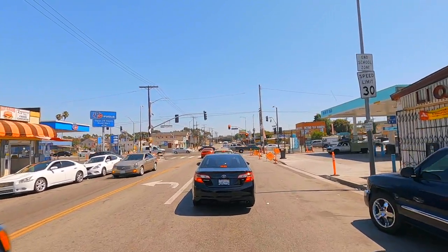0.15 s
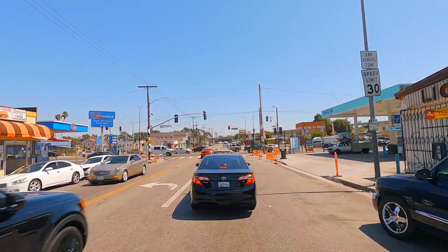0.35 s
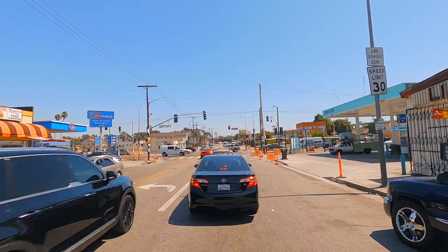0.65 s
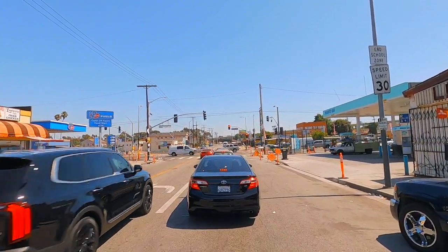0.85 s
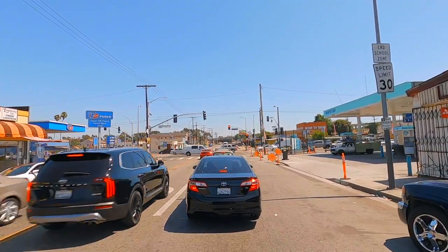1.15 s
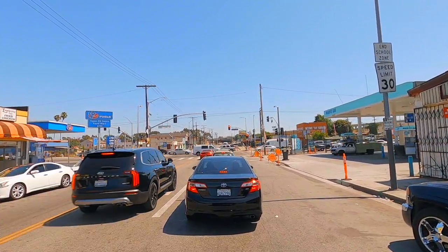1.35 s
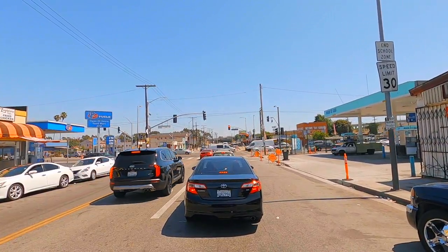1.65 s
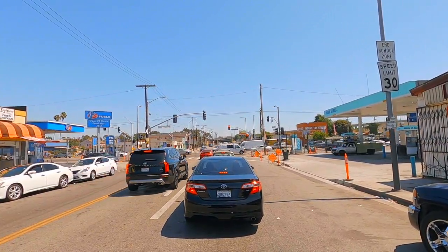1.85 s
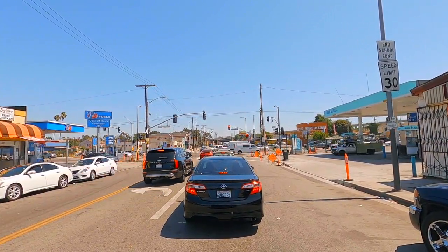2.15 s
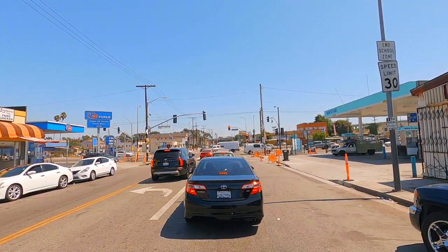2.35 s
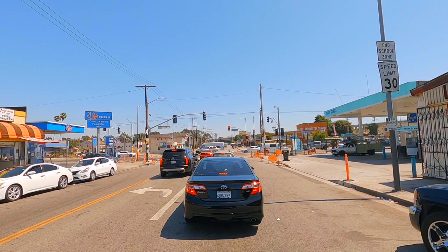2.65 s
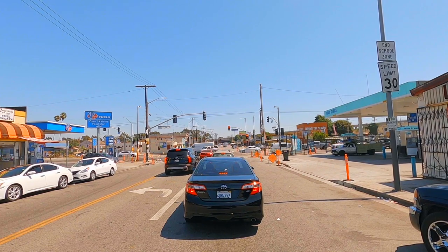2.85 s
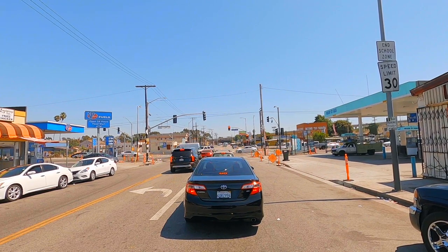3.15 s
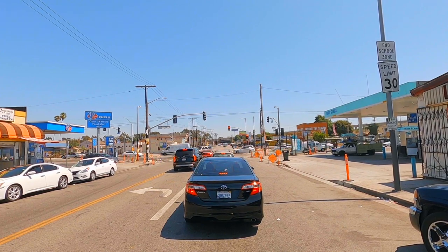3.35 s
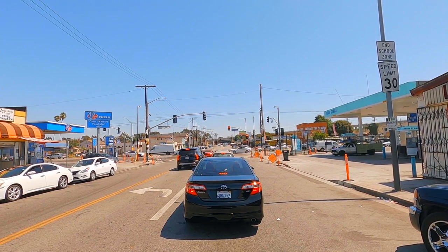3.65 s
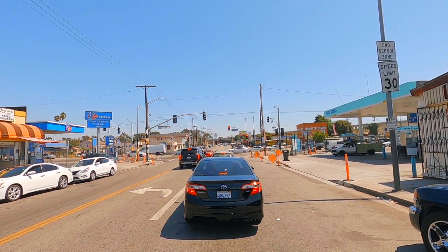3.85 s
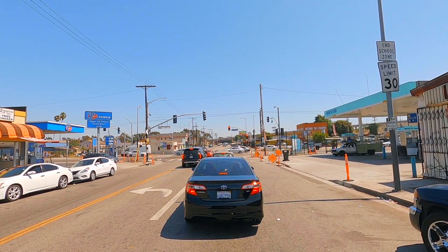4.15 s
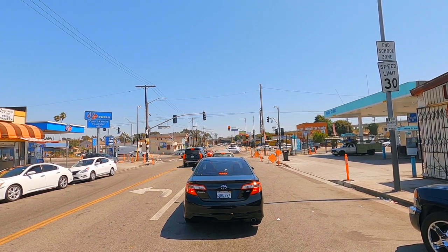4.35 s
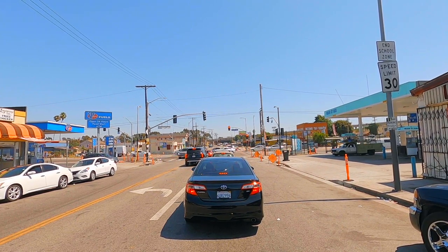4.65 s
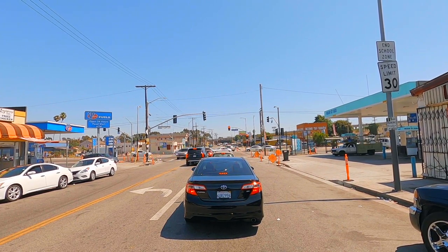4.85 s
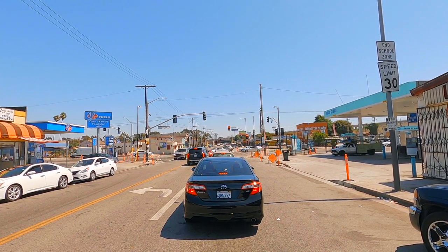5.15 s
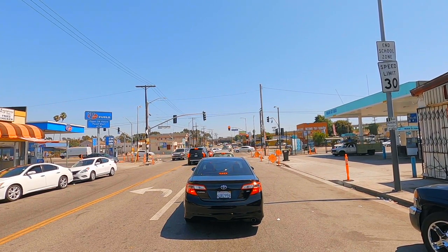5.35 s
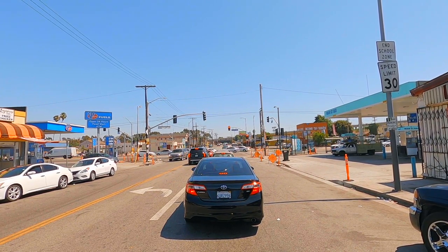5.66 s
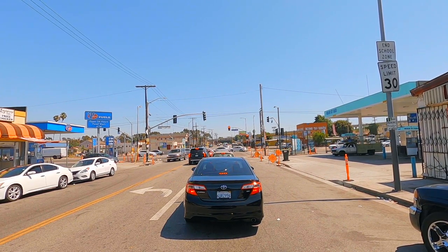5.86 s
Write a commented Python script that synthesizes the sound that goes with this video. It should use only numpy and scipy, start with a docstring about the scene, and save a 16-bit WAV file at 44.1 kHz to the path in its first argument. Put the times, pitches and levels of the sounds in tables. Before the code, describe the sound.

A vehicle sweeps past over soft tyre roar and engine rumble, then a nearby car horn beeps sharply twice, echoing briefly off the street.

```python
"""City traffic: engines hum and tyres roar and hiss throughout, made from coloured noise and a wavering tone.
First an SUV whirrs past among close tyre swishes; a brief faint moan and a slow swell of roar follow.
Then a two-note horn, built from partials, toots twice close by, and cars and shop fronts echo each toot.
Between the toots the engines ease to idle. A limiter ducks loud peaks and lets the street up again slowly."""
import sys
import numpy as np
from scipy import signal
from scipy.fft import rfft, irfft, next_fast_len
from scipy.io import wavfile
from scipy.ndimage import uniform_filter1d, minimum_filter1d, map_coordinates

SR = 44100
rng = np.random.default_rng(int(sys.argv[2]) if len(sys.argv) > 2 else 0)


def put_to_file(sound):
    """Save the sound as 16-bit audio at rate SR, in the file named by the first command-line argument."""
    columns = np.atleast_2d(sound).T  # one column per channel
    safe = np.clip(columns, -1, 1)
    whole_steps = np.round(safe * 32767)
    wavfile.write(sys.argv[1], SR, whole_steps.astype(np.int16))


N = 264908

# Taps on the horn: start_s, level_db, length (times a normal tap)
HORN_TAPS = [(3.477, -1.6, 1.04), (4.383, -1.5, 1.1)]
# Partials of the lower horn, for a normal tap: pitch_hz, level_db, build_up_s, ring_down_s (to -60 dB)
LOW_HORN_PARTIALS = [(410, -12.5, .032, .06), (812, -3, .0135, .09), (1224, -3.6, .0215, .04),
                     (1650, -23.5, .02, .028), (2024, -24.5, .021, .08), (2850, -53, .022, .05)]
# Partials of the higher horn, for a normal tap: pitch_hz, level_db, build_up_s, ring_down_s (to -60 dB)
HIGH_HORN_PARTIALS = [(522, -9, .03, .072), (1013, -9.2, .0212, .088), (1533, -29.5, .0326, .14),
                      (2045, -35, .025, .1), (2505, -41, .018, .055), (2585, -46, .036, .06)]
# Echoes off road, cars and shop fronts, before the panels colour them: delay_s, level_db
WALL_ECHOES = [(.00624, -15.5), (.02525, -16), (.02732, -13.5), (.04042, -18.5), (.05803, -24.5),
               (.06083, -24.5), (.08649, -27), (.11712, -39)]
# How small panels colour the echoes, with little bass: pitch_hz, gain_db
PANEL_COLOUR = [(350, -8), (550, -3.5), (850, 5), (1500, 1), (2600, -3.5)]
# How long scattered sound lasts in the street: pitch_hz, decay_s (to -60 dB)
STREET_DECAY = [(300, 0.3), (1000, 0.49), (3000, 0.21), (10000, 0.08)]
# Colour of tyre roar on asphalt: pitch_hz, relative_level_db (per Hz)
ROAR_COLOUR = [(90, -34.5), (180, -8), (225, 0), (330, -2.5), (460, -2), (620, -3.5), (950, -4.5),
               (1200, -11), (1500, -17.5), (1850, -23.5), (2400, -32.5), (3100, -41.5), (4000, -50),
               (8000, -87)]
# Colour of air squeezed from the treads: pitch_hz, relative_level_db (per Hz)
HISS_COLOUR = [(1500, -19.5), (3000, -3.5), (4800, -1), (6500, -5), (9000, -9.5), (12000, -13.5),
               (15000, -14.5)]
# Wheels passing close: peak_s, half_length_s, level_db, pitch (times the usual swish)
CLOSE_WHEELS = [(0.117, 0.33, -75, 0.96), (1.122, 0.14, -72.5, 1.01), (1.3, .056, -78.5, 1.15),
                (1.52, 0.14, -69, 0.76), (1.9, .35, -80, 0.84)]
# Colour of the usual tread swish: pitch_hz, relative_level_db (per Hz)
SWISH_COLOUR = [(2000, -17), (2900, -1.5), (3600, -7), (4200, -6), (4750, 3.5), (5200, -6), (5600, -0.5),
                (6600, -13.5), (8000, -13), (11000, -27), (15000, -45)]
# Vehicles going by, roar before the body lift: loudest_s, time_to_half_power_s, level_db
VEHICLE_PASSES = [(.15, 0.19, -39.7), (1.55, 1, -38)]
# Colour of the SUV's whirr: pitch_hz, relative_level_db (per Hz)
WHIRR_COLOUR = [(1200, -29), (1600, -3), (1800, 3.5), (2100, -5.5), (2600, -13.5), (3300, -34), (5000, -60)]
# Colour of engine rumble: pitch_hz, relative_level_db (per Hz)
RUMBLE_COLOUR = [(15, -28.5), (25, -12), (50, -9), (75, -5.5), (105, -1.5), (170, -2.5), (280, -9.5),
                 (420, -36.5), (800, -95)]

FAR_TRAFFIC_DB = -43  # steady roar of the rest of the street, before the body lift
HISS_DB, HISS_FOLLOWS = -81, 0.59  # hiss with far traffic alone, and the dB it gains for each dB of roar
PULL_DB, IDLE_DB = -48, -49  # engine base level when pulling gently, then idling
EASE_AT_S, EASE_S = 3.9, .3  # when and how slowly the engines drop to idle
TOP_HZ = 15400  # nothing is kept from here up


def amp(db):
    """Turn decibels into gain."""
    return 10 ** (np.asarray(db) / 20)


def unit(x):
    """Scale x to an average strength (rms) of 1."""
    return x / np.sqrt(np.mean(x ** 2) + 1e-20)


def along(points, hz):
    """Read values between (pitch, value) points, with pitch on a log axis."""
    f, v = np.transpose(points)
    return np.interp(np.log(hz + 1), np.log(f + 1), v)


def wobble(rate):
    """A smooth random curve through `rate` random points a second."""
    knots = rng.standard_normal(int(N * rate / SR) + 4)
    return map_coordinates(knots, [np.arange(N) * rate / SR])


def filtered(x, response):
    """Multiply each frequency in x by its gain."""
    m = next_fast_len(N + SR // 2)
    gain = response(np.fft.rfftfreq(m, 1 / SR))
    return irfft(rfft(x, m) * gain, m)[:N]


def rush(spectrum, patchy_db):
    """Coloured noise of rms 1, with random louder and softer patches in time and pitch."""
    z = signal.stft(rng.standard_normal(N), nperseg=1024)[2]
    field = uniform_filter1d(rng.standard_normal(z.shape), size=5, axis=0)  # smooth across pitch
    field = uniform_filter1d(field, size=10, axis=1)  # smooth across time
    patchy = z * amp(patchy_db * unit(field))
    noise = signal.istft(patchy, nperseg=1024)[1][:N]
    return unit(filtered(noise, lambda hz: amp(along(spectrum, hz))))


def toots():
    """Each tap sounds both horns, about a major third apart, and the street answers."""
    out = np.zeros(N)
    for start, db, length in HORN_TAPS:
        t = np.arange(N) / SR - start
        both = horn(LOW_HORN_PARTIALS, t, length) + horn(HIGH_HORN_PARTIALS, t, length)
        out += amp(db) * street(both)
    return out


def horn(partials, t, length, waver=0.005, sharpen=0.0056, rough=0.22, lag_hz=800):
    """The diaphragm builds up while the contact is closed, then each partial rings down in the trumpet."""
    tone = np.zeros(N)
    for hz, db, build, t60 in partials:
        driven = np.clip(t / (build * length), 0, 1)
        rise = np.sin(np.pi / 2 * driven) ** (1 + hz / lag_hz)  # overtones need a wide swing and come later
        fall = amp(-60 * np.maximum(t - build * length, 0) / t60)
        bend = sharpen * (driven - fall) * (t > 0)  # flat at the start, sharp as the swing dies
        drift = np.cumsum(bend + waver * wobble(150) * driven) / SR
        chatter = 1 + rough * wobble(400)  # the contact breaker closes unevenly
        wave = np.sin(2 * np.pi * hz * (t + drift))
        tone += amp(db) * rise * fall * chatter * wave
    return tone


def street(x, scatter_db=-25):
    """Surfaces return distinct delayed echoes and a faint scattered tail that dies at its own rate per pitch."""
    hz, t, z = signal.stft(rng.standard_normal(SR // 2), SR, nperseg=256)
    decay = amp(-60 * t / along(STREET_DECAY, hz)[:, None])
    tail = signal.istft(z * decay, SR, nperseg=256)[1]
    scatter = signal.fftconvolve(x, tail / np.linalg.norm(tail))[:N]
    echoes = np.zeros(N)
    for delay, db in WALL_ECHOES:
        echoes += amp(db) * np.pad(x, (round(delay * SR), 0))[:N]
    coloured = filtered(echoes, lambda f: amp(along(PANEL_COLOUR, f)))
    return x + coloured + amp(scatter_db) * scatter


def tyres(roar_db, body_db=0.44):
    """The roar and a thin, steadier hiss carry from the whole street; wheels that pass close add a swish."""
    t = np.arange(N) / SR
    roar = amp(roar_db + body_db + 0.32 * wobble(8.9)) * rush(ROAR_COLOUR, patchy_db=1.0)
    hiss_db = HISS_DB + HISS_FOLLOWS * (roar_db - FAR_TRAFFIC_DB)
    hiss = amp(hiss_db + 0.27 * wobble(14.0)) * rush(HISS_COLOUR, patchy_db=1.5)
    swish = np.zeros(N)
    for peak, width, db, pitch in CLOSE_WHEELS:
        tread = [(hz * pitch, level) for hz, level in SWISH_COLOUR]
        swell = np.exp(-((t - peak) / width) ** 2)
        swish += amp(db) * swell * rush(tread, patchy_db=3.0)
    return roar + hiss + swish


def passing_db():
    """Each vehicle's roar falls with the square of its distance, over the steady far traffic."""
    t = np.arange(N) / SR
    near = np.zeros(N)
    for peak, width, db in VEHICLE_PASSES:
        near += amp(db) ** 2 / (1 + ((t - peak) / width) ** 2)
    return 10 * np.log10(amp(FAR_TRAFFIC_DB) ** 2 + near)


def overtaker(at=0.2, width=.42, level_db=-58.0):
    """A mid-pitched whirr swells as the SUV draws level, and fades as it pulls ahead (times in s)."""
    t = np.arange(N) / SR
    swell = np.exp(-((t - at) / width) ** 2)
    return amp(level_db) * swell * rush(WHIRR_COLOUR, patchy_db=-0.5)


def moan(pitch_hz=705, level_db=-35.5, at=1.36, width=.055):
    """A brief faint tone with a wavering pitch rises out of the traffic (times in s)."""
    swell = np.exp(-((np.arange(N) / SR - at) / width) ** 2)
    turns = np.cumsum(pitch_hz * (1 + 0.0053 * wobble(40))) / SR
    return amp(level_db) * swell * np.sin(2 * np.pi * turns)


def engines(level_db, firing_hz=110, hum_db=-10, rumble_db=1.5):
    """Exhaust rumble, with the unsteady firing note of the nearest engine; both are set against level_db."""
    turns = np.cumsum(firing_hz * (1 + .035 * wobble(7))) / SR
    hum = unit(np.sin(2 * np.pi * turns) * amp(4 * wobble(5.3)))
    rumble = rush(RUMBLE_COLOUR, patchy_db=2.0)
    return amp(level_db) * (amp(hum_db) * hum + amp(rumble_db) * rumble)


def throttle_db():
    """The engines pull gently, then ease off to idle as the queue slows."""
    eased = (1 + np.tanh((np.arange(N) / SR - EASE_AT_S) / EASE_S)) / 2
    return PULL_DB + (IDLE_DB - PULL_DB) * eased


def lag(x, seconds):
    """Smooth x so it follows changes with a short delay."""
    pole = np.exp(-1 / (seconds * SR))
    return signal.lfilter([1 - pole], [1, -pole], x)


def limiter(x, ceiling_db=-5.5, attack=0.00012, step_db=0.9, step_edge=.00009):
    """Peaks push the gain down in small steps, which tick; it holds, then creeps back up (times in s)."""
    hold, release_db = .2, 19  # s, dB a second
    needed_db = np.minimum(ceiling_db - 20 * np.log10(np.abs(x) + 1e-9), 0)
    half = int(hold * SR / 2)
    held_db = minimum_filter1d(needed_db, 2 * half + 1, origin=half)
    ramp_db = release_db * np.arange(N) / SR
    # the running minimum lets the gain rise no faster than the ramp
    released_db = np.minimum.accumulate(held_db - ramp_db) + ramp_db
    gain_db = lag(released_db, attack)
    stepped_db = step_db * np.round(gain_db / step_db)
    return x * amp(lag(stepped_db, step_edge))


def scene():
    """Add the traffic and the horn close by."""
    traffic = engines(throttle_db()) + tyres(passing_db()) + overtaker() + moan()
    return (traffic + toots())[None]


def record(dry):
    """Limit loud peaks, then keep only what lies below the top frequency."""
    limited = limiter(dry[0])
    return filtered(limited, lambda hz: hz < TOP_HZ)[None]


dry = scene()
out = record(dry)
put_to_file(out)
```